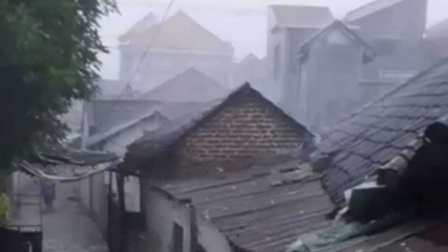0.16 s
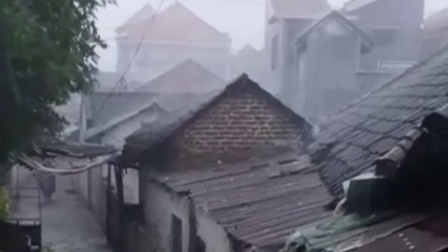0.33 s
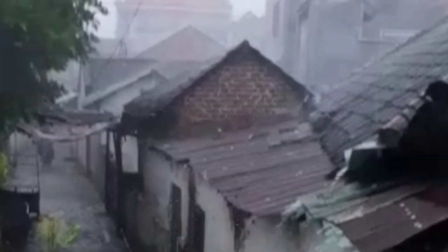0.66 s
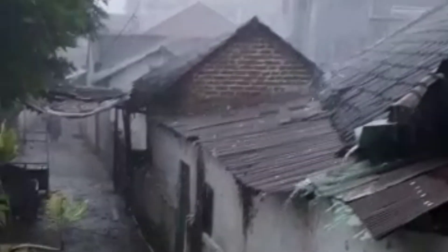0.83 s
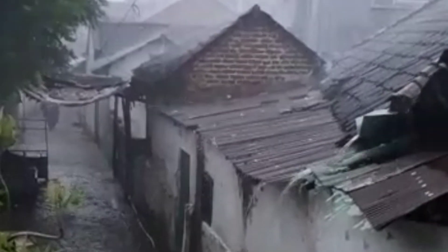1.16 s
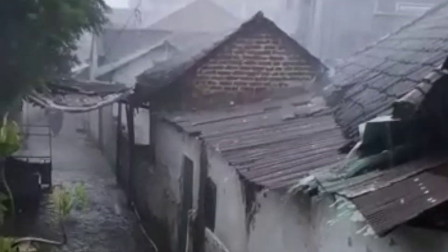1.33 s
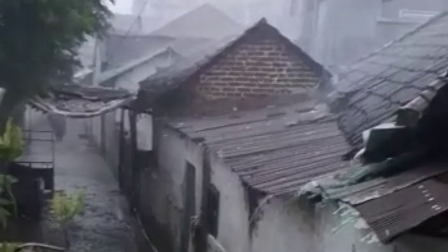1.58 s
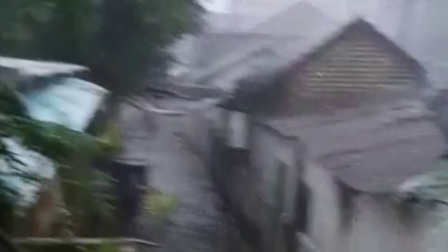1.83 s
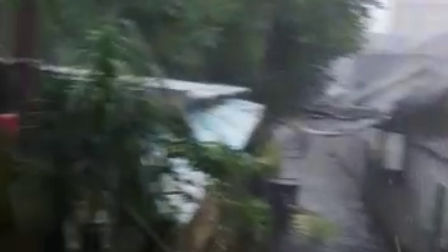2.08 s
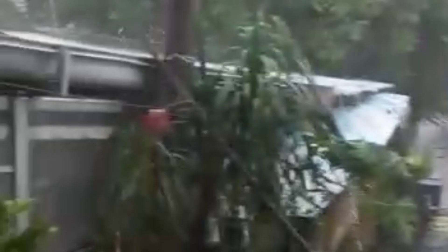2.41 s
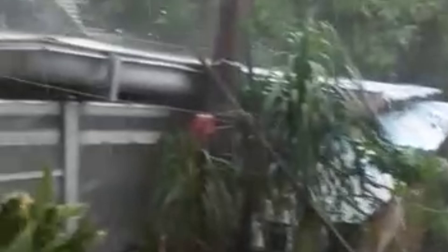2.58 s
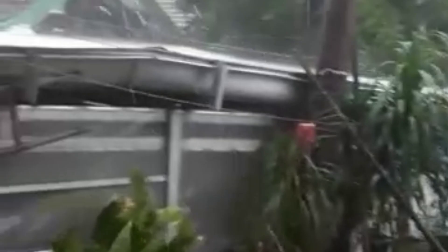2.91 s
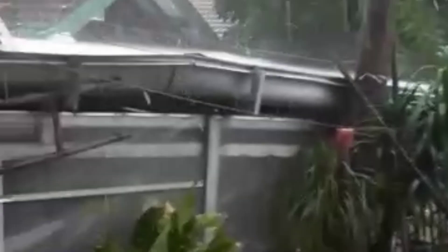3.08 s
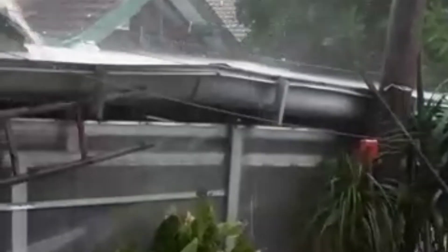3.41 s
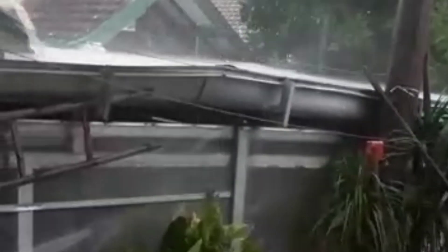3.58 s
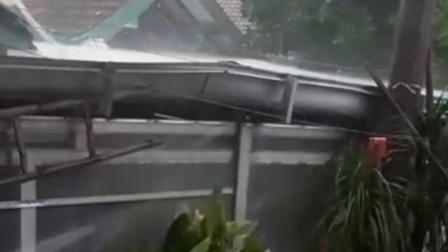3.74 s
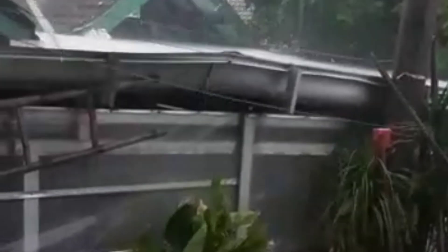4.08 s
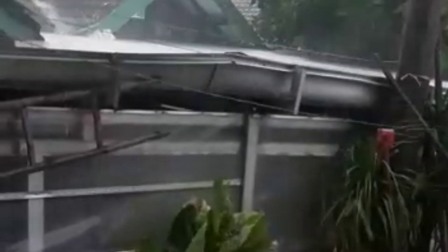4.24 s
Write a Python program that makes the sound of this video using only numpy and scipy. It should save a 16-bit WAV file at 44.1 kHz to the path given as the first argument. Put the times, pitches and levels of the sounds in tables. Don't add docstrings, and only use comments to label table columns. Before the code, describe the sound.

Big hailstones clang, knock and sometimes ring on tin roofs amid a loud steady roar of rain, the hardest hits distorting.

```python
import sys
import numpy as np
from scipy import signal
from scipy.fft import rfft, irfft, next_fast_len
from scipy.io import wavfile

SR = 44100
rng = np.random.default_rng(int(sys.argv[2]) if len(sys.argv) > 2 else 0)


def wrap_up_sound(samples):
    columns = np.atleast_2d(samples).T
    tamed = np.clip(columns, -1, 1)
    steps = np.round(tamed * 32767).astype(np.int16)
    wavfile.write(sys.argv[1], SR, steps)


def voltage_ratio(decibels):
    exponent = np.asarray(decibels, float) / 20
    return 10 ** exponent


N = 195482
BLOW = int(0.4 * SR)


def stones():
    thud, drum, clang, splash = field(rng.standard_normal((3, N)))
    out = np.zeros((2, N))
    for k, (start_s, clang_db, pitch_hz, drum_db, splash_db, t60_s) in enumerate(stone_rows()):
        part = slice(k * 1800, k * 1800 + BLOW)
        panel = rms_one(resonance(clang[:, part], pitch_hz, 0.098 * pitch_hz))
        panel += voltage_ratio(7.5) * clang[:, part]
        blow = panel * voltage_ratio(clang_db - 15.0) * fade(t60_s, rise_s=0.0034)
        lows = drum[:, part] + voltage_ratio(-11.5) * thud[:, part]
        blow += lows * voltage_ratio(drum_db - 8.5) * fade(1.23 * t60_s, rise_s=0.0014)
        blow += splash[:, part] * voltage_ratio(splash_db + 7.0) * fade(0.83 * t60_s, rise_s=0.006)
        add(out, start_s - 0.002, blow)
    return out


def stone_rows():
    # start_s, clang_db (peak), pitch_hz, splash_db
    near_stones = [(0.0094, -23, 1990, -41), (0.0706, -12, 1750, -34), (0.2219, -4, 1650, -34),
                   (0.5568, -3, 2760, -35), (0.6658, -9, 2510, -33), (0.7426, -0.5, 3140, -28),
                   (0.8494, -37, 2910, -31), (1.023, -2.5, 2560, -28.5), (1.0692, -5.5, 2340, -35),
                   (1.1094, -3, 3800, -27), (1.2031, -6.5, 2780, -46), (1.3146, -11, 1700, -33),
                   (1.4134, -6.5, 1650, -60), (1.4988, -6.5, 2820, -30), (1.5658, -14, 3660, -34),
                   (1.7545, -7.5, 3520, -34), (1.7921, -5.5, 2820, -37), (2.972, -3, 1790, -32),
                   (3.0614, 1, 2380, -27.5), (3.255, -6, 2620, -32), (3.34, -2, 2800, -25),
                   (3.369, 0, 2070, -27), (3.3994, 0.5, 2160, -25), (3.4294, -3, 2700, -35),
                   (3.5644, -7, 1880, -31), (3.6504, -4.5, 2260, -30), (3.8003, -13, 3240, -32),
                   (3.985, -7, 2250, -32), (4.0794, -2.5, 3520, -33), (4.178, -13, 2980, -31.5)]
    # start_s, clang_db (peak), pitch_hz
    far_stones = [(0.3134, -12, 2350), (0.4802, -13, 3900), (0.6987, -9, 2230), (0.7994, -11, 2970),
                  (1.5743, -7, 4340), (1.5894, -4, 3540), (1.9492, -11, 2470), (2.0784, -8.5, 2430),
                  (2.1044, -6.5, 2090), (2.1676, -6.5, 2080), (2.2956, -13, 2040), (2.3455, -9, 4030),
                  (2.386, -6, 2640), (2.416, -9, 3900), (3.322, -11, 2900), (2.4594, -9, 1720),
                  (2.6488, -10.5, 1900), (2.6993, -8.5, 2130), (2.7887, -10, 2470), (2.9394, -13, 1470),
                  (3.1289, -11, 2060), (3.1991, -10.5, 2950), (3.5007, -3, 3400), (3.7295, -5, 2770),
                  (3.8794, -11.5, 3400), (4.1195, -10.5, 3850), (4.2704, -11, 1530), (4.3196, -17, 2510),
                  (4.4159, -10.5, 2700)]
    # start_s, drum_db
    roof_knocks = [(0.3134, -33), (0.3444, -11.5), (0.3994, -25), (0.5568, -11.5), (0.6096, -13.5),
                   (0.6658, -8.5), (0.6987, -8), (0.7293, -13.5), (0.8488, -13), (0.9934, -11.5),
                   (1.0692, -11), (1.2399, -17.5), (1.3138, -22), (1.4134, -10.5), (1.5894, -13.5),
                   (1.8192, -11.5), (2.1039, -10.5), (2.386, -14), (2.461, -11), (2.649, -13.5),
                   (2.9399, -14), (2.961, -9.5), (3.0614, -9.5), (3.369, -5.5), (3.4288, -13), (3.5007, -9),
                   (3.5642, -8), (3.7297, -11.5), (4.0398, -13), (4.2693, -12)]
    # start_s, splash_db
    sharp_ticks = [
        (0.743, -27),
        (1.117, -27),
        (1.565, -21),
        (1.575, -11),
        (1.581, -24),
        (3.34, -29),
        (3.568, -29),
        (3.987, -17),
        (4.178, -21),
    ]
    near = [(s, db, hz, db - 17.5, splash_db, 0.24) for s, db, hz, splash_db in near_stones]
    far = [(s, db, hz, db - 13, db - 35, 0.32) for s, db, hz in far_stones]
    knocks = [(s, db - 4, 1990, db, db - 30, 0.27) for s, db in roof_knocks]
    cracks = [(s, db + 11, 4500, db, db, 0.033) for s, db in sharp_ticks]
    return near + far + knocks + cracks


def pings():
    # start_s, level_db (peak), pitch_hz
    ringing_panels = [(0.31, -12, 817), (0.315, -11.5, 1440), (0.33, -8.5, 1390), (0.343, -14, 807),
                      (1.1, -12, 1002), (2.13, -55, 2220), (2.17, -47, 2150), (3.135, -10, 2280),
                      (0.745, -4, 3090), (0.56, -15, 5120), (0.725, -8.5, 1012), (0.745, -4.5, 1896),
                      (0.795, -11, 1050), (1.04, -7, 2330), (1.196, -13.5, 892), (1.585, -9, 838),
                      (2.289, -14.5, 1040), (3.062, -12, 2290), (3.365, 1.5, 2090), (3.42, -9, 2120),
                      (3.41, -10, 1150), (3.44, -8.5, 1110), (3.495, -1, 3840), (3.99, -11.5, 1200),
                      (4.265, -15, 1053), (1.316, -11, 1485)]
    # start_s, level_db (peak), pitch_hz, t60_s
    near_sheet = [
        (1.559, 0.5, 3470, 0.056),
        (1.561, -6, 4090, 0.037),
        (1.566, -5, 5060, 0.044),
        (1.569, -1, 4360, 0.016),
        (1.572, -8.5, 3000, 0.059),
        (1.576, -6, 4020, 0.051),
        (1.582, -13, 3530, 0.07),
        (4.173, 0.5, 3060, 0.025),
    ]
    out, t = np.zeros((2, N)), np.arange(BLOW) / SR
    rows = [(s, db, hz, 0.02 + 80 / hz) for s, db, hz in ringing_panels] + near_sheet
    phases = rng.uniform(0, 2 * np.pi, (len(rows), 3, 2, 1))
    apart = rng.uniform(0.026, 0.055, (len(rows), 2))
    for (start_s, level_db, pitch_hz, t60_s), (main, above, below), (up, down) in zip(rows, phases, apart):
        turn = 2 * np.pi * pitch_hz * t
        sides = np.sin(turn * (1 + up) + above) + np.sin(turn * (1 - down) + below)
        modes = np.sin(turn + main / 4) + 0.33 * sides
        add(out, start_s + 0.005, voltage_ratio(level_db) * modes * fade(t60_s, rise_s=0.001))
    return out


def fade(t60_s, rise_s):
    t = np.arange(BLOW) / SR
    return (1 - np.exp(-t / rise_s)) * voltage_ratio(-60 * t / np.clip(t60_s, 0.02, 0.6))


def add(out, start_s, sound):
    i = round(start_s * SR)
    out[:, i:i + sound.shape[-1]] += sound[:, :N - i]


def rain():
    # start_s, hiss_db
    downpour = [(0.0, -19), (0.2, -20), (0.42, -17), (0.63, -21), (0.78, -14.5), (0.97, -17.5), (1.44, -18),
                (1.62, -23), (1.85, -19.5), (2.17, -20.5), (2.33, -24), (2.78, -21.5), (3.0, -16.5),
                (3.29, -15.5), (3.55, -15), (3.74, -22), (4.06, -21.5), (4.43, -23)]
    hiss_db = np.interp(np.arange(N) / SR, *np.transpose(downpour))
    swing_db = hiss_db - hiss_db.mean()
    rumble_db = -32.5 + 0.96 * swing_db + 0.13 * drift(1.2)
    drum_db = -25 + 0.77 * swing_db
    spray_db = -34.5 + 0.64 * swing_db
    drops = rng.standard_normal((3, N))
    drops += voltage_ratio(-5.0) * patter(per_s=1100, spread_db=2.5, t60_s=0.048, width=0.067)
    drops += voltage_ratio(-5.5) * ticks(per_s=300, t60_s=0.012)
    rumble, drum, hiss, spray = field(drops)
    gust_db = 1.3 * drift(1.6)
    out = rumble * voltage_ratio(rumble_db)
    out += drum * voltage_ratio(drum_db - 2.0 + gust_db + 1.5 * drift(2.3))
    out += hiss * voltage_ratio(hiss_db + 2.5 + gust_db + 0.39 * drift(6))
    out += spray * voltage_ratio(spray_db + 0.94 + gust_db + 0.37 * drift(25))
    return out


def patter(per_s, spread_db, t60_s, width):
    blows = voltage_ratio(spread_db * np.minimum(rng.exponential(1, N), 1.1)) * (rng.random(N) < per_s / SR)
    pitches_hz = np.geomspace(700, 5600, 24)
    panel_hit = rng.integers(0, 24, N)
    noise = rng.standard_normal((2, 3, N))
    keep = voltage_ratio(-60 / (t60_s * SR))
    total = np.zeros((3, N))
    for k, pitch_hz in enumerate(pitches_hz):
        strength = signal.lfilter([1], [1, -keep], blows * (panel_hit == k) + 1e-18)
        total += resonance(strength * noise[k % 2], pitch_hz, width * pitch_hz)
    return rms_one(total)


def ticks(per_s, t60_s):
    sizes = voltage_ratio(2.6 * np.minimum(rng.exponential(1, N), 3.0)) * (rng.random(N) < per_s / SR)
    strength = signal.lfilter([1], [1, -voltage_ratio(-60 / (t60_s * SR))], sizes + 1e-18)
    return rms_one(strength * rng.standard_normal((3, N)))


def drift(rate_hz):
    r = np.exp(-80 * np.pi * rate_hz / SR)
    slow = signal.lfilter([1], [1, -2 * r, r * r], rng.standard_normal(N // 40 + 2002))[2000:]
    return np.interp(np.arange(N) / 40, np.arange(len(slow)), rms_one(slow))


def field(sources):
    # pitch_hz, level_db (per Hz)
    roof_colour = [(25, -36.5), (120, -20.5), (165, -16), (300, -16), (610, -11), (760, 2.5), (1100, 4.5),
                   (1700, -4), (2100, -0.5), (4200, -3), (5000, -8.5), (8300, -28), (10500, -20.5),
                   (15300, -26.5)]
    # pitch_hz, left_minus_right_db
    side_tilt = [(60, 3.5), (240, 0.5), (940, 0.5), (3750, -0.5), (14900, 4)]
    # pitch_hz, share (0 to 1)
    side_likeness = [(30, .1), (60, .4), (130, 0.85), (290, 0.88), (640, 0.81), (1100, 0.25), (3000, 0.092),
                     (7000, 0.017), (15000, 0.16)]
    lag_s = 0.00012
    size = next_fast_len(N)
    hz = np.maximum(np.arange(size // 2 + 1) * SR / size, 1)
    shared, left, right = rfft(sources, size)
    alike = np.clip(at_hz(side_likeness, hz), 0, 1)
    early = shared * np.exp(2j * np.pi * hz * lag_s)
    left = np.sqrt(alike) * early + np.sqrt(1 - alike) * left
    right = np.sqrt(alike) * shared + np.sqrt(1 - alike) * right
    tilt_db = at_hz(side_tilt, hz) * np.array([[0.5], [-0.5]])
    pair = np.array([left, right]) * voltage_ratio(at_hz(roof_colour, hz) + tilt_db)
    under = [0] + [1 / (1 + (hz / edge_hz) ** 12) for edge_hz in (600, 1500, 7000)] + [1]
    bands = []
    for lower, upper in zip(under, under[1:]):
        band = irfft(pair * np.sqrt(np.maximum(upper - lower, 0)), size)
        bands.append(rms_one(band[:, :N]))
    return bands


def resonance(x, pitch_hz, width_hz):
    r = np.exp(-np.pi * width_hz / SR)
    poles = [1, -2 * r * np.cos(2 * np.pi * pitch_hz / SR), r * r]
    return signal.lfilter([(1 - r * r) / 2, 0, (r * r - 1) / 2], poles, x)


def rms_one(x):
    return x / np.sqrt(np.mean(x ** 2) + 1e-20)


def at_hz(points, hz):
    table_hz, values = np.array(points).T
    return np.interp(np.log(hz), np.log(table_hz), values)


def scene():
    return stones() + pings() + rain()


def roll_off(x):
    return signal.sosfilt(signal.butter(12, 15300, fs=SR, output="sos"), x)


def record(dry):
    clipped = np.clip(dry, -0.95, 0.95)
    top = signal.cheby2(12, 50, 16100, fs=SR, output="sos")
    return roll_off(signal.sosfilt(top, clipped))


dry = scene()
out = record(dry)
wrap_up_sound(out)
```